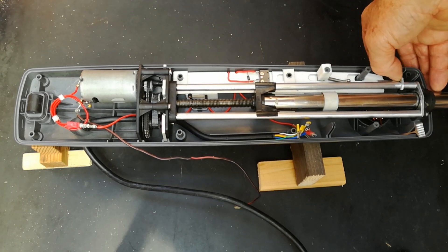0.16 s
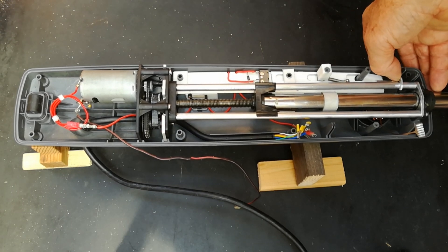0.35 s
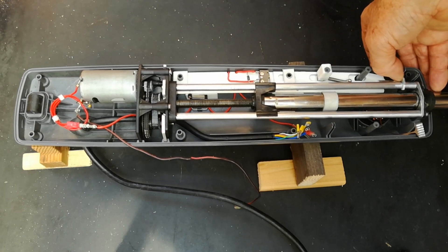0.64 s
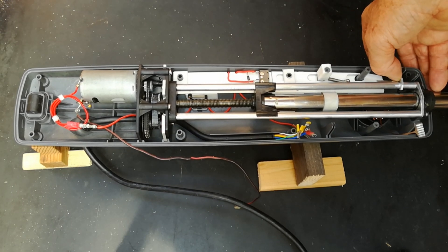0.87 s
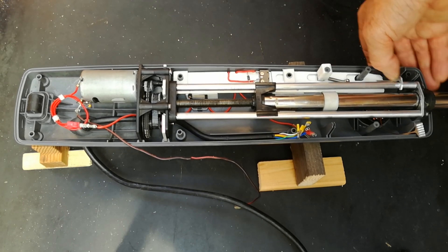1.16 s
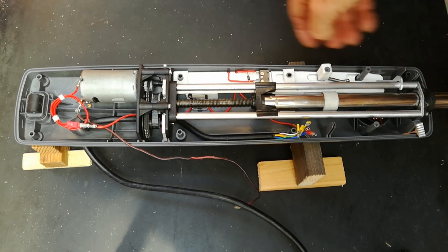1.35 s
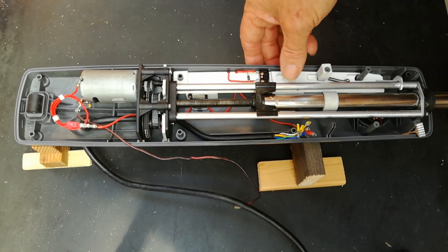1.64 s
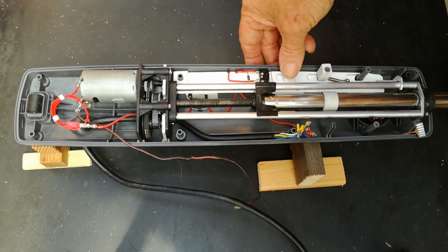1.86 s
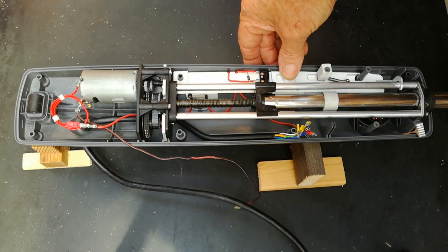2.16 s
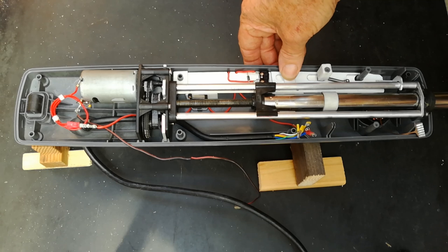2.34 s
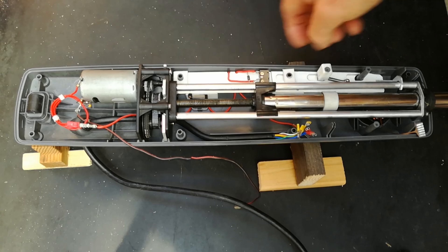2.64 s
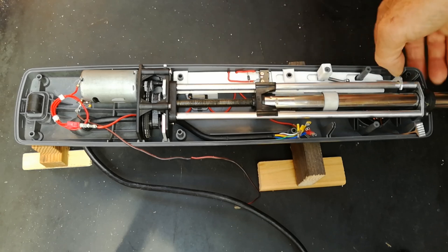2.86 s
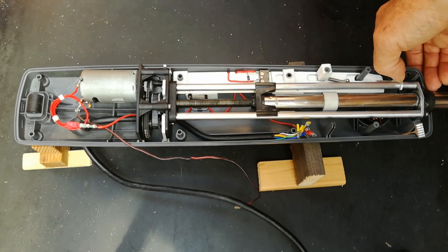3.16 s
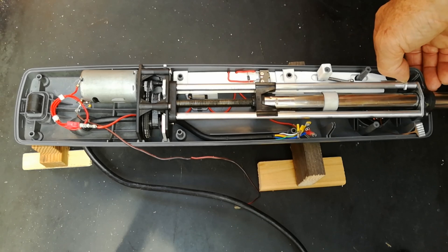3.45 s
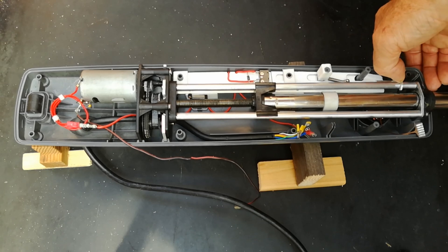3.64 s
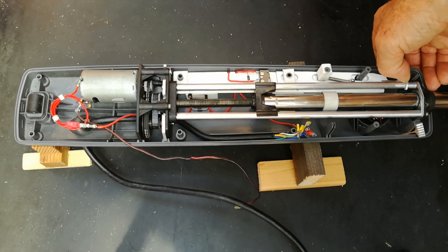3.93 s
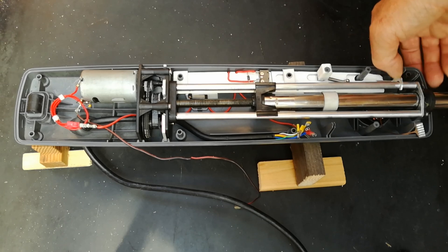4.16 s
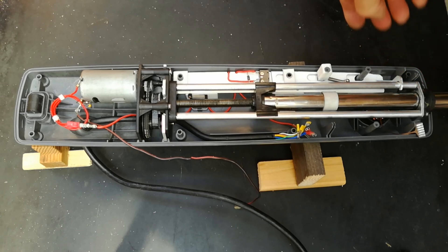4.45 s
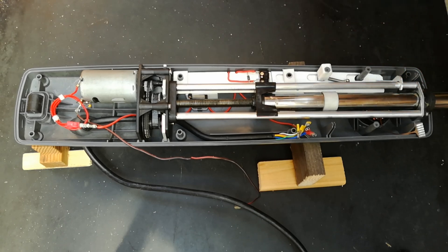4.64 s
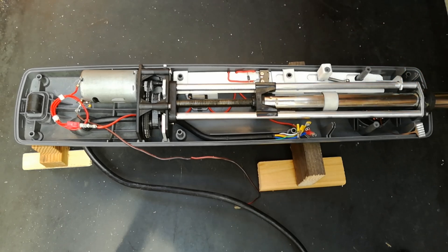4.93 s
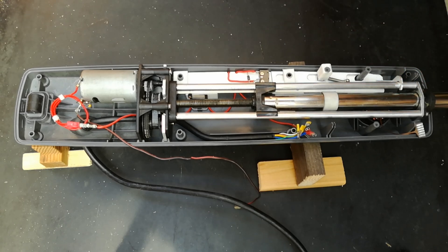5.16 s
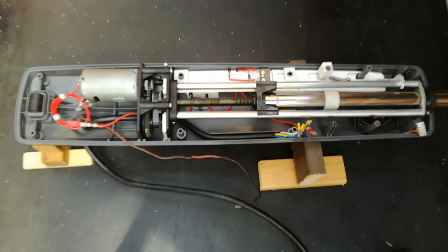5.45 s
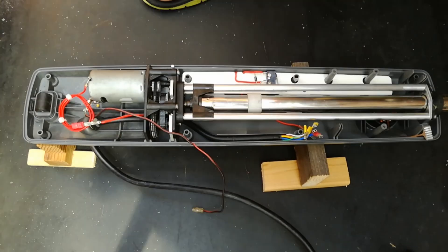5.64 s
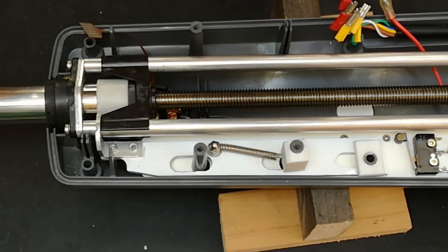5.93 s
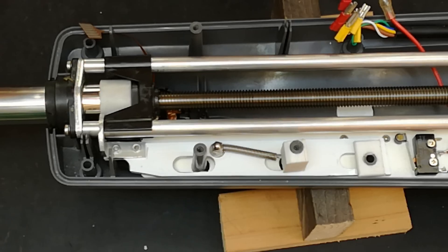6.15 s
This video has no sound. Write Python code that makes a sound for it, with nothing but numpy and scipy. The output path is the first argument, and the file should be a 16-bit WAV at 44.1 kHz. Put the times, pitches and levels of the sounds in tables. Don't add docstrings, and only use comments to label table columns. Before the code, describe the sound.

In a quiet shed, sharp switch snaps and light metal knocks, a very loud close click, brief silence, then a short rough motor whirr.

```python
import sys
import numpy as np
from scipy import signal
from scipy.fft import rfft, irfft, next_fast_len
from scipy.io import wavfile
from scipy.ndimage import uniform_filter1d

SR = 44100
rng = np.random.default_rng(int(sys.argv[2]) if len(sys.argv) > 2 else 0)


def decibels_to_gain(level_db):
    exponent = np.asarray(level_db, float) / 20
    return 10 ** exponent


def inscribe(sig):
    pcm = np.round(np.clip(np.atleast_2d(sig).T, -1, 1) * 32767)
    wavfile.write(sys.argv[1], SR, pcm.astype(np.int16))


N = 277830
T = np.arange(N) / SR
PADDED = next_fast_len(int(N + SR // 4))
HZ = np.fft.rfftfreq(PADDED, 1 / SR)


def unit(x):
    return x / np.sqrt(np.mean(x ** 2))


def shape(x, points):
    hz, db = np.transpose(points)
    gain = decibels_to_gain(np.interp(np.log(HZ + 1), np.log(hz), db))
    return irfft(rfft(x, PADDED) * gain, PADDED)[..., :N]


def tilt(x, db_per_octave, pivot_hz=3000):
    low = signal.lfilter(*signal.butter(1, pivot_hz, fs=SR), x)
    return low * decibels_to_gain(-db_per_octave) + (x - low) * decibels_to_gain(db_per_octave)


def thin(x, low_hz, order=2):
    return signal.sosfilt(signal.butter(order, low_hz, "high", fs=SR, output="sos"), x)


def ring(x, modes, widen=1.):
    out = 0
    for k, (hz, width_hz, db) in enumerate(modes):
        r = np.exp(-np.pi * width_hz * widen / SR)
        poles = [1, -2 * r * np.cos(2 * np.pi * hz / SR), r * r]
        out = out + (-1) ** k * decibels_to_gain(db) * (1 - r) * signal.lfilter([1, 0, -1], poles, x)
    return out


def add(track, s, sound, db):
    i = int(s * SR)
    track[i:i + len(sound)] += (decibels_to_gain(db) * sound / np.abs(sound).max())[:N - i]


def walk(rate_hz):
    k = int(SR / rate_hz)
    steps = np.repeat(rng.standard_normal(N // k + 1), k)
    return unit(uniform_filter1d(uniform_filter1d(steps, k), k)[:N])


def held(s, values):
    return np.asarray(values)[np.searchsorted((s[1:] + s[:-1]) / 2, T)]


def swell(rows, order=2):
    out = np.zeros(N)
    for s, db, rise_s, fall_s, *_ in rows:
        near = slice(max(int((s - 4 * rise_s) * SR), 0), int((s + 4 * fall_s) * SR))
        late = T[near] - s
        out[near] += decibels_to_gain(db - 20 * np.where(late < 0, -late / rise_s, late / fall_s) ** order)
    return out


def grains(per_s, spread_db, channels=1):
    moment, sign, size = rng.random((3, channels, N))
    return unit((moment < per_s / SR) * np.sign(sign - .5) * decibels_to_gain(-spread_db * np.log(size + 0.00051)))


def breathy(phase, width_hz, share):
    noise = walk(width_hz) * np.sin(phase) + walk(width_hz) * np.cos(phase)
    return np.sqrt(2 * (1 - share)) * np.sin(phase) + np.sqrt(share) * noise


def whistles(calls, width_hz, share, sag_hz=0):
    s, *_, hz = np.transpose(calls)
    arch_s = .05
    pitch_hz = held(s, hz) - sag_hz * np.minimum(((T - held(s, s)) / arch_s) ** 2, 4)
    return swell(calls) * breathy(2 * np.pi * np.cumsum(pitch_hz) / SR, width_hz, share)


def snaps(events):
    out, lead_s = np.zeros(N), 40 / SR
    late = T[:SR // 50] - lead_s
    for s, db, hz, width_hz in events:
        pulse = np.exp(-(np.pi * width_hz * late / 2.4) ** 2) * np.cos(2 * np.pi * hz * late + 2.6)
        add(out, s - lead_s, pulse, db)
    return out


def place(x, balance, lag_s, wet_db, t60):
    t, x = T[:SR // 5], x * np.ones((2, 1))
    echo = rng.standard_normal((2, len(t))) * np.exp(-np.log(1000) * t / t60) * (t > .001)
    echo /= np.sqrt(np.sum(echo ** 2, 1))[:, None]
    wet = signal.oaconvolve(x, echo, axes=1)[:, :N] * decibels_to_gain(wet_db)
    high = 1 / (1 + (1700 / (HZ + 1)) ** 6)
    delay = 1 - high + high * np.exp(-2j * np.pi * HZ * lag_s)
    late = irfft(rfft(x[0], PADDED) * delay, PADDED)[:N]
    return np.array([shape(late + wet[0], balance), x[1] + wet[1]])


# hz, level_db (per Hz)
ROOM_MID = [(35, -30), (60, -8.5), (76, -1.5), (204, -6.5), (224, -9.5), (304, -10.5), (412, -18.5),
            (1060, -15), (1850, -21), (2040, -22.5), (2520, -24), (3750, -24.5), (4220, -27.5),
            (15000, -40), (16500, -28)]
ROOM_SIDE = [(35, -41.5), (60, -8), (318, -3.5), (384, -3.5), (546, -5.5), (615, -3.5), (938, -5.5),
             (1570, -13), (2460, -13), (15000, -28.5), (16500, -26)]
# start_s, swell_db
OUTDOOR_SWELL = [(0, 0.5), (3.5, 1.5), (4.9, 3), (5.7, 4), (6.3, -0.5)]
# hz, level_db (per Hz)
RUMBLE_TONE = [(8.8, -41.5), (15, -5.5), (54, -1.5), (65, -4), (80, -12), (114, -11), (162, -36),
               (206, -24.5), (300, -33.5), (390, -52.5), (660, -120)]
# loudest_s, level_db, rise_s, fall_s
RUMBLE_SWELLS = [(.17, -63, 0.15, .07), (.29, -65, 0.072, 0.22), (.59, -65, 0.11, 0.053),
                 (1.44, -53.5, 0.075, 0.13), (1.62, -72, 0.045, 0.18), (2.46, -71, 0.074, 0.18),
                 (2.99, -67.5, 0.12, 0.11), (3.68, -68, 0.27, 0.14), (4.2, -59.5, 0.18, 0.068),
                 (4.47, -72, 0.091, 0.051), (4.72, -73, 0.092, 0.11), (5.38, -52, 0.039, .05),
                 (5.435, -52.5, 0.026, .2), (5.85, -71, 0.15, 0.22), (6.12, -61, 0.16, 0.17),
                 (6.3, -50, 0.048, .1)]


def shed():
    mid = unit(shape(rng.standard_normal(N), ROOM_MID)) * decibels_to_gain(-71)
    side = unit(shape(rng.standard_normal(N), ROOM_SIDE)) * decibels_to_gain(-73.5)
    swell_db = np.interp(T, *np.transpose(OUTDOOR_SWELL)) / 2
    wander = decibels_to_gain(swell_db + .7 * walk(5))
    left = tilt(mid + side, swell_db, 1500) * decibels_to_gain(0.64)
    right = tilt(mid - side, swell_db, 2100) * decibels_to_gain(1.68)
    rumble_gain = swell(RUMBLE_SWELLS) + decibels_to_gain(-72 + 0.5 * walk(4.5))
    rumble = unit(shape(rng.standard_normal(N), RUMBLE_TONE)) * rumble_gain
    return rumble + wander * np.array([left, right])


# loudest_s, level_db, rise_s, fall_s, pitch_hz
FLOOR_HUM = [
    (1.44, -47.5, .13, 0.1, 49),
    (4.19, -60, 0.072, 0.045, 48),
    (5.44, -55, 0.044, 0.23, 52.1),
]


def floor():
    return whistles(FLOOR_HUM, 12, 0.25)


# loudest_s, level_db, rise_s, fall_s, pitch_hz (times per 20 dB)
BIRD_CALLS = [(.54, -71, 0.089, 0.12, 3770), (.96, -72.5, .06, 0.34, 3350),
              (1.59, -66.5, 0.09, 0.075, 3890), (1.734, -63, 0.033, 0.01, 3920),
              (1.81, -77, 0.058, 0.15, 3830), (2.46, -68, .08, 0.12, 3800),
              (3.642, -59.5, 0.066, 0.11, 3830), (4.235, -77, 0.074, 0.071, 3850)]


def birds():
    return whistles(BIRD_CALLS, 450, .92, sag_hz=162.6)


# loudest_s, level_db, rise_s, fall_s
SLEEVE_BRUSH = [
    (4.68, -55.5, 0.1, 0.068),
]
# hz, level_db (per Hz)
CLOTH_TONE = [(530, -42), (900, -15), (1620, -12), (2090, -9), (2300, -3.5), (3820, -0.5), (7680, -5),
              (16000, -23)]


def sleeve():
    fibres = grains(7500, 1.8) + grains(9000, 1.7, channels=2)
    return unit(shape(fibres, CLOTH_TONE)) * swell(SLEEVE_BRUSH)


# loudest_s, level_db, rise_s, fall_s, pitch_hz
SPRING_PARTIAL_A = [(1.165, -65, .05, 0.059, 852), (3.575, -61, 0.11, 0.094, 2320)]
SPRING_PARTIAL_B = [(1.15, -69, 0.16, 0.047, 1410), (3.55, -65.5, 0.11, 0.095, 1920)]
SPRING_PARTIAL_C = [(1.13, -81, .03, 0.1, 3150), (3.515, -63.5, .03, 0.048, 3595),
                    (3.57, -65, 0.099, 0.092, 3270)]


def spring():
    partials = (SPRING_PARTIAL_A, SPRING_PARTIAL_B, SPRING_PARTIAL_C)
    return sum(decibels_to_gain(-2) * whistles(partial, 140, .85) for partial in partials)


# hz, width_hz, level_db
PLATE_MODES = [(890, 100, -0.5), (1250, 86, 3.5), (1700, 177, -0.5), (2680, 89, 2), (3150, 207, -0.5),
               (3460, 183, 0), (4080, 154, -1.5), (5660, 290, -7), (7230, 240, -8.5), (9400, 600, -17),
               (13000, 3000, -27.5)]
# arrival_s, level_db, length_s, bright_db (per octave)
PLATE_TRAVEL = [(0.117, -60, 0.048, 4.5), (0.356, -57.5, 0.014, 3.5), (0.632, -56.5, 0.041, 5),
                (0.875, -52.5, 0.022, 9.5), (1.062, -51, 0.035, 3), (2.524, -77, 0.041, -5),
                (3.183, -67.5, 0.024, 8), (3.482, -56, 0.062, 1.5), (4.007, -56, 0.075, 0)]
# start_s, level_db, fade_s (per 20 dB), bright_db (per octave)
PLATE_SETTLE = [(0.127, -54, 0.0639, 1.5), (0.368, -54, 0.0744, 3.5), (0.643, -53, 0.0526, 3),
                (0.88, -52.5, 0.0552, 8.5), (1.085, -56.5, 0.13, -1), (2.448, -71, 0.1, -9),
                (2.527, -77, 0.13, 8), (3.193, -57.5, 0.0956, 5.5), (3.495, -60.5, 0.11, 6.5),
                (3.703, -56, 0.076, 9), (4.015, -53.5, 0.0959, -2.5)]


def slide():
    scrape = unit(ring(grains(7000, 3.0) + grains(7000, 4.4, channels=2), PLATE_MODES, 2.26))
    gain = swell([(s, db, .007, fade_s) for s, db, fade_s, _ in PLATE_SETTLE], order=1)
    gather_db, jolt_db, jolt_s, start_s = 9.5, 8.5, 0.0018, 0.0077
    for s, db, length_s, _ in PLATE_TRAVEL:
        span = slice(int((s - length_s) * SR), int(s * SR))
        to_go = s - T[span]
        push_db = db - gather_db * to_go / length_s + jolt_db * (to_go < jolt_s)
        gain[span] += decibels_to_gain(push_db) * np.minimum((length_s - to_go) / start_s, 1)
    moves = np.array(sorted(PLATE_TRAVEL + PLATE_SETTLE))
    uneven = uniform_filter1d(gain * decibels_to_gain(1.14 * walk(150) + 3.0), size=200)
    return tilt(scrape, held(moves[:, 0], moves[:, 3])) * uneven


# start_s, peak_db, pitch_hz, t60_s, crack_db
PLATE_KNOCKS = [(0.069, -56, 1610, 0.065, -1), (0.144, -38.5, 773, 0.059, -3.5),
                (0.343, -53, 2760, 0.052, 21), (0.389, -40, 3110, 0.043, -3),
                (0.664, -49.5, 770, 0.033, -5), (0.894, -40.5, 3090, 0.045, -9),
                (1.0435, -46, 1400, 0.034, 7), (1.058, -36, 1730, .03, 6), (1.097, -37.5, 1700, 0.063, 0),
                (1.135, -50, 1950, .08, -6), (2.446, -41, 738, 0.025, -4.5),
                (2.457, -44.5, 1203, 0.059, -13), (2.945, -55, 1040, 0.038, -2),
                (3.146, -53, 2250, 0.059, 9), (3.218, -40, 3140, 0.065, 4), (3.456, -40.5, 3430, .04, -6),
                (3.461, -43, 1800, .03, -16), (3.721, -42.5, 2790, 0.099, 3), (3.962, -54, 524, 0.36, -20),
                (3.975, -40.5, 1700, 0.038, 2), (3.944, -52, 1480, .04, 6), (4.031, -30.5, 1250, 0.01, -20),
                (4.144, -56, 1120, 0.073, -3), (4.823, -54.5, 1390, 0.065, 10.5),
                (5.818, -51, 831, 0.13, 7)]
# start_s, peak_db, pitch_hz, t60_s, crack_db
METAL_TICKS = [(0.6065, -41, 3480, 0.04, -2), (.1, -55, 4100, .04, -9), (.62, -52, 4300, .04, -4),
               (2.5216, -44.5, 3920, 0.044, -13), (2.5254, -49, 2090, 0.086, -12),
               (5.8187, -57.5, 4890, 0.051, -2), (5.8411, -51, 4950, 0.022, 1),
               (5.867, -54, 4750, 0.037, -1)]


def knocks(events):
    out, t = np.zeros(N), T[:SR // 5]
    for s, db, hz, t60, crack_db in events:
        width = 2.2 / np.clip(t60, .01, .3)
        push = np.exp(-(t * hz * 4 - 1.5) ** 2)
        modes = [(hz, width, 0), (1.27 * hz, 2 * width, -3), (.72 * hz, 2 * width, -9), (1.9 * hz, 3 * width, -5)]
        body = ring(push, modes)
        crack = ring(rng.standard_normal(len(t)) * np.exp(-t / 0.0049), PLATE_MODES, 3.8)
        hit = body / np.abs(body).max() + decibels_to_gain(crack_db) * crack / np.abs(crack).max()
        add(out, s, hit, db)
    return out


# start_s, peak_db, contact_s
END_STOPS = [
    (1.0755, -23, .0001),
    (1.082, -46, .00015),
    (4.027, -35.5, 0.00036),
]
# hz, width_hz, level_db
END_STOP_MODES = [(519.5, 20, -4), (805, 33, -0.5), (974, 23, -1), (1250, 130, -5), (1400, 20, -2),
                  (1636, 28, 1), (1750, 80, 5.5), (2015, 64, -0.5), (2299, 33, -1), (2627, 36, -2),
                  (3085, 42, -12), (3400, 40, -9)]


def stops():
    out, t = np.zeros(N), T[:SR // 4]
    for s, db, contact_s in END_STOPS:
        push = (1 + .3 * rng.standard_normal(len(t))) * np.exp(-(t / contact_s - 2) ** 2)
        add(out, s, ring(push, END_STOP_MODES), db)
    return out


# start_s, peak_db, bright_db (per octave), burst_s
SWITCH_PRESS = [(0.119, -26.5, -0.5, 0.0047), (0.6351, -26.5, -1.5, 0.0037), (1.064, -24.5, -8, 0.0043),
                (3.4879, -26, -1, 0.0045), (4.0052, -26, -2, 0.0031)]
SWITCH_RELEASE = [(0.361, -22.5, 0, 0.0017), (0.8696, -26, 0.0096, 0.0068), (3.1844, -22.5, 0, 0.0018),
                  (3.692, -22, 0.01, 0.00081)]
# hz, width_hz, level_db
SWITCH_PRESS_MODES = [(1250, 200, -6), (1830, 230, -4), (2680, 250, 2.5), (3150, 250, -7), (4300, 350, -8),
                      (4950, 200, -8.5), (5360, 170, -4.5), (5950, 200, -10.5), (6960, 135, -1.5),
                      (9050, 110, -28), (9720, 120, -9.5), (12400, 500, -17), (15300, 550, -19)]
SWITCH_RELEASE_MODES = [(1410, 76, -9), (1920, 110, -8.5), (2870, 460, -4), (3920, 170, -13),
                        (4950, 150, -8), (5410, 214, 3), (6860, 220, -2.5), (7830, 190, -2.5),
                        (9000, 210, -3.5), (12200, 680, -20), (14100, 220, -21), (15300, 330, -23),
                        (5397, 37, 2)]


def switch(events, modes):
    out, t = np.zeros(N), T[:SR // 20]
    for s, db, bright_db, burst_s in events:
        decay = np.exp(-t / np.clip(burst_s / 2, 3e-4, .02))
        chatter = rng.standard_normal(len(t)) * decay * np.minimum(t / 0.00051, 1)
        case = 0
        for hz, width_hz, mode_db in modes:
            vary_db = 1.5 * rng.standard_normal()
            mode = unit(ring(chatter, [(hz, width_hz, mode_db)]))
            case = case + mode * decibels_to_gain(mode_db + vary_db) * np.sqrt(width_hz)
        snap = tilt(unit(case) + 0.026 * unit(chatter), bright_db)
        add(out, s, thin(snap, 1340), db + 2.5)
    return out


# start_s, peak_db, centre_hz, width_hz
DOME_SNAPS = [
    (5.3757, -2.5, 8160, 7100),
    (5.3956, -7, 5100, 5030),
    (5.3958, -3.5, 8000, 8800),
]
# start_s, peak_db, centre_hz, width_hz
CASE_TAPS = [(5.3666, -15, 2500, 7000), (5.3765, -28.5, 4010, 5020), (5.3827, -46.5, 11100, 7900),
             (5.3879, -27, 900, 3000), (5.3916, -22.5, 1500, 4000), (5.3928, -19, 3510, 9000),
             (5.3967, -26, 4340, 2500), (5.4365, -44, 4000, 8000)]
# start_s, level_db, rise_s, fade_s (per 20 dB)
SHELL_CREAK = [(5.367, -43, .0006, -0.0056), (5.3755, -44, .002, -0.0068), (5.3915, -35, 0.00087, 0.0137),
               (5.403, -51, .004, 0.027), (5.437, -68, .004, 0.09)]
# start_s, peak_db
FINGER_THUMPS = [
    (5.368, -30.5),
    (5.3758, -39),
    (5.396, -42),
]
# hz, level_db
SHELL_TONE = [(120, -25), (250, -0.5), (1300, -1), (2300, 0.5), (4500, -5), (6640, -9), (9000, -22.5),
              (14000, -32)]
# hz, level_db
CAMERA_RING = [(1200, 12), (1561, 4), (3451, 0), (3914, 2), (5238, 3), (8958, -20), (10140, -7)]
# hz, left_minus_right_db
DOME_BALANCE = [(100, -5), (1200, -3), (2400, -10.5), (4400, -16.5), (8000, -33), (15000, -24)]
SHELL_BALANCE = [(100, 7.5), (300, 7), (1200, 10.5), (4400, 10.5), (8000, 1.5), (15000, 6.5)]


def button():
    thump, t = np.zeros(N), T[:SR // 5]
    for s, db in FINGER_THUMPS:
        add(thump, s, np.sin(2 * np.pi * 58 * t) * np.exp(-t / 0.031), db)
    dome = snaps(DOME_SNAPS)
    rub = grains(5400, 2.8) + .5 * grains(5000, 2.0, channels=2)
    creak = unit(shape(rub, SHELL_TONE)) * swell(SHELL_CREAK, order=1)
    shell = snaps(CASE_TAPS) * decibels_to_gain(-9.5) + creak
    tone = ring(dome + 3 * shell[0], [(hz, 19, db) for hz, db in CAMERA_RING])
    both = place(dome, DOME_BALANCE, -.0006, -46, .05) + place(shell, SHELL_BALANCE, -.0002, -24, .03)
    return both + decibels_to_gain(-7) * tone * decibels_to_gain(np.array([[-3], [0]])) + thump


# start_s, level_db
MOTOR_LOAD = [(6.03, -65), (6.042, -46), (6.052, -44.5), (6.064, -31), (6.1, -30.5), (6.125, -29.5),
              (6.16, -32.5), (6.205, -32.5), (6.235, -34.5), (6.26, -33.5), (6.272, -32), (6.3, -30)]
# start_s, mesh_hz
MESH_SPEED = [(6.03, 892), (6.075, 1279), (6.098, 1581), (6.122, 1660), (6.135, 1900), (6.17, 1500),
              (6.205, 1250), (6.225, 1132), (6.255, 958), (6.272, 1282), (6.288, 1652), (6.3, 1750)]
# start_s, hiss_boost_db, rise_s, fall_s
GEAR_BITE = [
    (6.052, 12.5, 0.01, 0.007),
]
# level_db (at mid speed), slope_db (per doubling of speed)
BRUSH_LEVEL = (-3, 8.8)
AIR_LEVEL = (-17, 3.6)
WHINE_LEVEL = (-8, 0)
# hz, level_db
HOUSING_SING = [(900, -7.5), (1100, -1), (1250, 3), (1430, 0), (1620, 2), (1750, -8), (2000, -5)]
# hz, width_hz, level_db
HOUSING_MODES = [(750, 94, -7.5), (876, 70, -1), (1040, 130, -1), (1305, 300, -5), (1600, 84, -2),
                 (1950, 120, -11)]
# hz, level_db (per Hz)
FRAME_TONE = [(1120, -24.5), (1900, -2.5), (2140, -7.5), (2560, -4), (2910, -3.5), (3840, -7), (4150, -8),
              (4650, -7.5), (7000, -28), (9100, -40), (15400, -120)]
AIR_TONE = [(3530, -25), (6000, 1), (8050, -1), (9060, -8), (10400, -6.5), (14200, -20), (15100, -12),
            (15900, -11)]


def motor():
    level_db = np.interp(T, *np.transpose(MOTOR_LOAD), left=-140)
    mesh_hz = np.interp(T, *np.transpose(MESH_SPEED))
    doublings = np.log2(mesh_hz / 1300)
    brush_db, air_db, mesh_db = (db + slope_db * doublings for db, slope_db in (BRUSH_LEVEL, AIR_LEVEL, WHINE_LEVEL))
    coasting = uniform_filter1d(1. * (np.gradient(mesh_hz) < 0), size=900)
    mesh_db = mesh_db + np.interp(mesh_hz, *np.transpose(HOUSING_SING)) + 2.5 * coasting
    mesh, bite = 2 * np.pi * np.cumsum(mesh_hz) / SR, 1 + swell(GEAR_BITE)
    shaft = 1 + 0.093 * np.sin(mesh / 24)
    bars = 1 + .4 * np.sin(6 * mesh / 24)
    overtones = decibels_to_gain(-10) * breathy(2 * mesh, 500, .9) + decibels_to_gain(-15) * breathy(3 * mesh, 700, .9)
    whine = (breathy(mesh, 200, .6) * shaft + overtones) * decibels_to_gain(mesh_db)
    teeth = grains(2500, 0.82) + 0.4 * grains(2200, 3.1, channels=2)
    grind = unit(thin(ring(teeth * shaft, HOUSING_MODES), 680, order=4)) * decibels_to_gain(-4)
    rattle = grains(9000, 1.8, channels=2) * shaft * bars
    brushes = unit(shape(rattle, FRAME_TONE)) * decibels_to_gain(brush_db)
    air = unit(shape(grains(9000, 2.3, channels=2) * bars, AIR_TONE)) * decibels_to_gain(air_db)
    gears = unit(ring(rng.standard_normal(N), [(105.0, 18, 1.5), (290, 850, -16.5)])) * decibels_to_gain(-21.5)
    run = (grind + whine + bite * (brushes + air) + gears) * uniform_filter1d(decibels_to_gain(level_db), size=90)
    start_knock = knocks([(6.0415, -30, 860, .045, -14), (6.042, -31, 1600, .04, -14)])
    return run + thin(start_knock, 600)


# hz, left_minus_right_db
BENCH_BALANCE = [(60, -7), (110, -0.5), (200, -0.5), (380, -55), (700, -0.5), (1290, -2), (2380, -3),
                 (4400, -5.5), (8120, -16.5), (15000, -1.5)]
MOTOR_BALANCE = [(700, -0.5), (1300, 1), (2400, -1), (4400, -5.5), (8100, -7.5), (15000, 5)]


def scene():
    snapping = switch(SWITCH_PRESS, SWITCH_PRESS_MODES) + switch(SWITCH_RELEASE, SWITCH_RELEASE_MODES)
    plate = knocks(PLATE_KNOCKS) + knocks(METAL_TICKS) + stops() + slide()
    bench = thin(snapping + plate, 520, order=4) + sleeve() + spring()
    near = place(bench, BENCH_BALANCE, .0006, -3.5, .025)
    drive = place(motor() + decibels_to_gain(-4) * birds(), MOTOR_BALANCE, .0006, -7, .04)
    return shed() + floor() + near + button() + drive


def top_cut(x):
    return signal.sosfilt(signal.butter(12, 16800, fs=SR, output="sos"), x)


# start_s, end_s
SCENE_CHANGE = (5.602, 5.659)


def record(dry):
    start_s, end_s = SCENE_CHANGE
    gate = np.clip(np.maximum(start_s - T, T - end_s) / 0.00085, 0, 1)
    top = signal.ellip(10, .3, 40, 15820, fs=SR, output="sos")
    return top_cut(signal.sosfilt(top, dry * gate))


dry = scene()
out = record(dry)
inscribe(out)
```